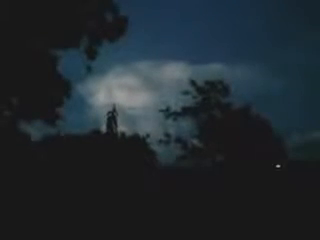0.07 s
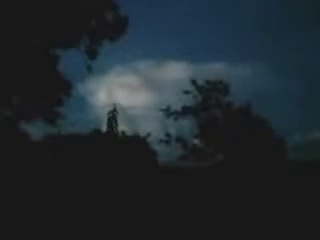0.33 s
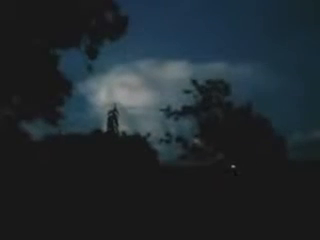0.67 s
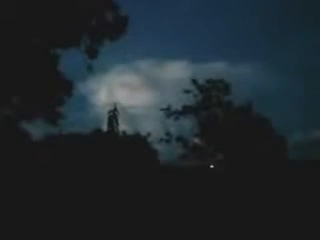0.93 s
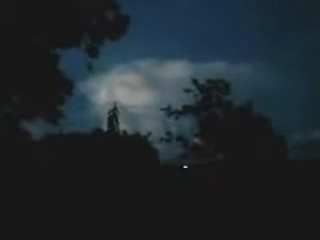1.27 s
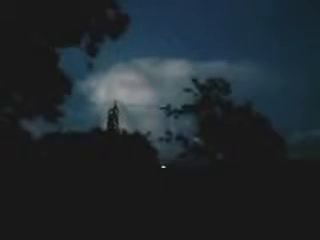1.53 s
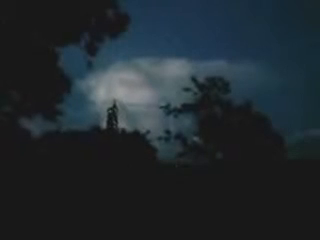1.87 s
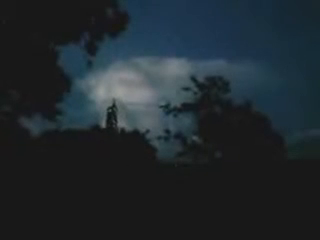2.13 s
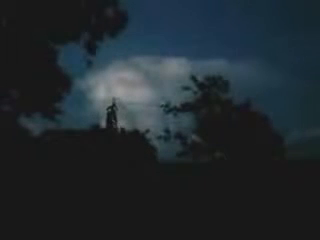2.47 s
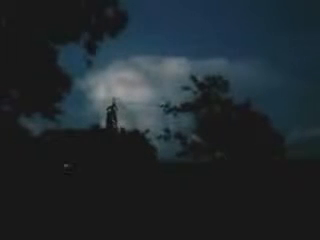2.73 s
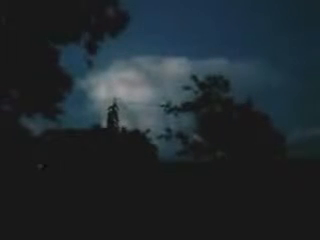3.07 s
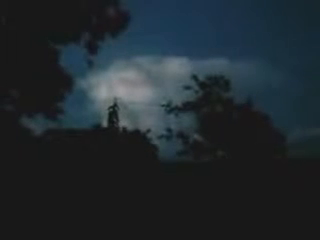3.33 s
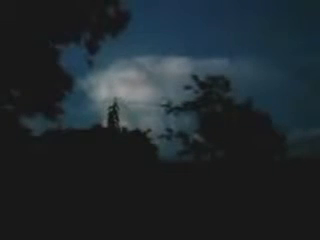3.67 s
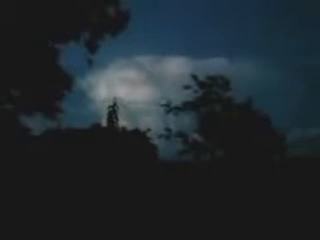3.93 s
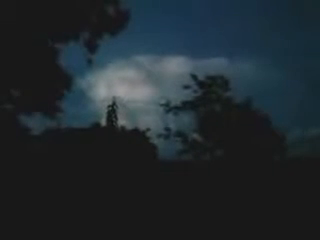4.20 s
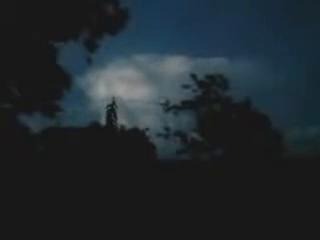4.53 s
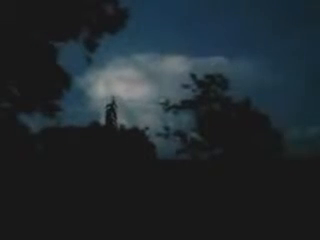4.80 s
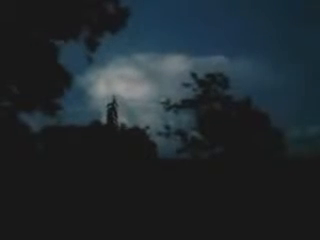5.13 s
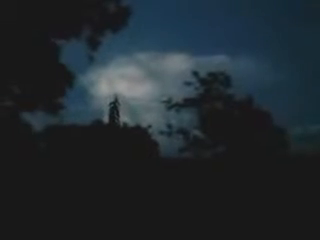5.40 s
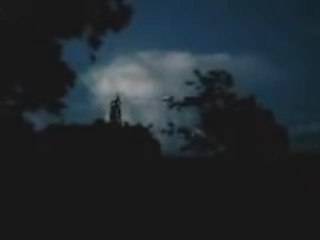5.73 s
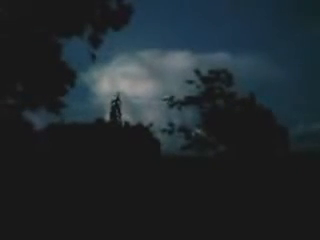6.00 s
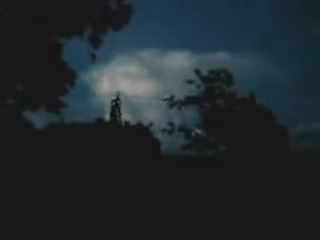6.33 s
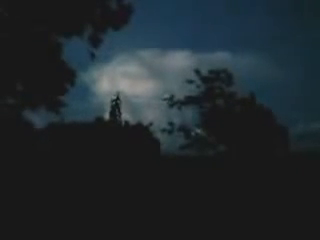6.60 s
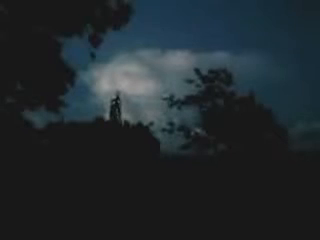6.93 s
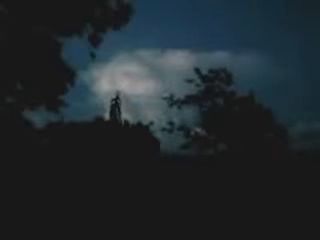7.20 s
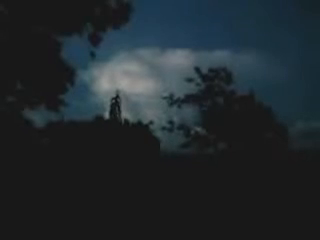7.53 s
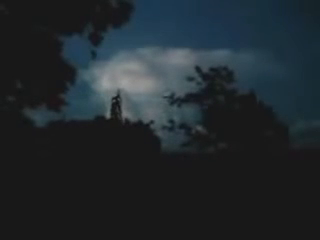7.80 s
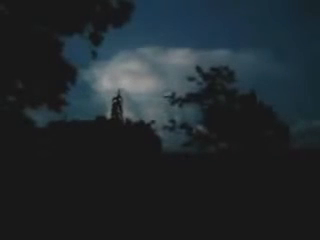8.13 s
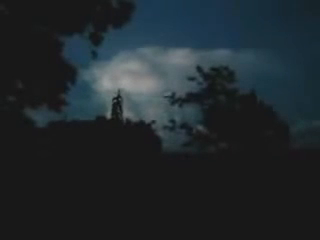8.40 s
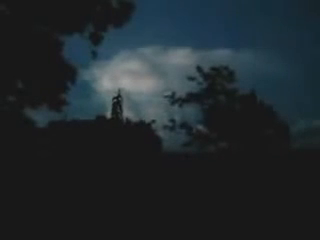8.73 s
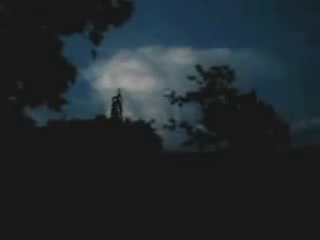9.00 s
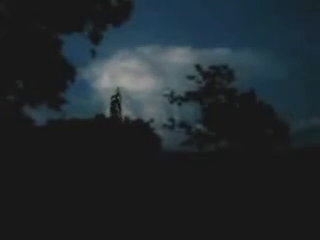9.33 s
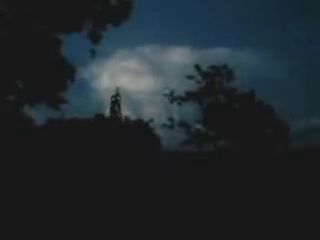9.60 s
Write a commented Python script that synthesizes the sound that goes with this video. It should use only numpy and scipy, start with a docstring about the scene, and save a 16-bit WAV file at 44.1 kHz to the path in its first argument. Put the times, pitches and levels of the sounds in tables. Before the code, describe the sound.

Husky, high bird calls echo among trees at dawn, over shimmering insects and the tyre roar and hum of far traffic.

```python
"""Birds close by at the edge of a swamp at dawn: short, shrill calls that sag and flick down at the end,
reaching the microphone in pulses. The trees around echo them, and others answer from far away.
A dense insect chorus shimmers steadily. On a distant road two cars pass with tyre roar and engine hum,
the first with a low drone. The microphone is a small camera's: mono, a narrow band, a faint hiss."""
import sys
import numpy as np
from scipy import signal
from scipy.fft import rfft, irfft, next_fast_len
from scipy.io import wavfile
from scipy.ndimage import uniform_filter1d

SR = 44100
rng = np.random.default_rng(int(sys.argv[2]) if len(sys.argv) > 2 else 0)


def log_audio(samples):
    """Write samples as a 16-bit WAV file to the path given in sys.argv[1]."""
    # one column per channel
    frames = np.atleast_2d(samples).T
    # limit to full scale, then quantise
    limited = np.clip(frames, -1, 1)
    pcm = np.round(limited * 32767).astype(np.int16)
    wavfile.write(sys.argv[1], SR, pcm)


N = 426006
TIME = np.arange(N) / SR


def undb(db):
    """Decibels to gain."""
    return 10 ** (np.asarray(db) / 20)


def unit(x):
    """Scale to rms 1."""
    return x / np.sqrt(np.mean(x ** 2))


def curves(table):
    """The columns of a table, joined by straight lines in time."""
    times, *columns = np.transpose(table)
    return [np.interp(TIME, times, column) for column in columns]


def bump(t, at, half_s):
    """A bell in time, 1 at its centre."""
    return np.exp(-((t - at) / half_s) ** 2)


def drift(rate, size=N):
    """Smooth random drift with about rate turns a second; spread near 1."""
    hold = int(SR / rate)
    steps = np.repeat(rng.standard_normal(size // hold + 1), hold)
    return 1.3 * uniform_filter1d(uniform_filter1d(steps, hold), hold)[:size]


def noise(spectrum):
    """Noise of rms 1 with the given colour, falling steeply beyond its ends."""
    size = next_fast_len(N)
    octave = np.log2(np.maximum(np.fft.rfftfreq(size, 1 / SR), 1))
    hz, db = np.transpose(spectrum)
    outside = np.abs(octave - np.clip(octave, np.log2(hz[0]), np.log2(hz[-1])))
    gain = undb(np.interp(octave, np.log2(hz), db) - 20 * outside)
    return unit(irfft(rfft(rng.standard_normal(size)) * gain, size)[:N])


def blurred(hz, width_hz):
    """A tone smeared into a narrow band of noise; rms near 1."""
    phase = 2 * np.pi * np.cumsum(hz * np.ones(N)) / SR
    return drift(2 * width_hz) * np.cos(phase) + drift(2 * width_hz) * np.sin(phase)


def nearness(at, half_s):
    """Gain of a source driving straight past the microphone: 1 at its nearest, then as 1 / distance."""
    return 1 / np.hypot(1, (TIME - at) / half_s)


# The insect chorus across the swamp (frequency [Hz], relative density [dB])
INSECT_SPECTRUM = [(2200, -15), (2950, -13.5), (3150, -3), (3330, -1), (3430, 2.5), (3570, -0.5),
                   (3750, -3.5), (4000, -9.5), (4200, -13.5), (4400, -19)]
def insects(db=-35.5, shimmer_db=2.0, swell_db=0.5, trill_hz=3416, trill_db=-45):
    """Countless trills merge into one shimmering band; one steady trill stands a little above it."""
    crowds = sum(noise(INSECT_SPECTRUM) * undb(shimmer_db * drift(70) + swell_db * drift(12))
                 for _ in range(2))
    return undb(db) * unit(crowds) + undb(trill_db) * blurred(trill_hz, width_hz=16)


# The open air at the microphone (frequency [Hz], relative density [dB])
AIR_SPECTRUM = [(15, -5), (35, -3), (55, -12), (80, -19.5), (200, -16), (500, -36), (2500, -20.5),
                (4000, -40.5)]
def air(db=-47.5, stir_db=3.6):
    """The air stirs: a low noise of uneven level."""
    return noise(AIR_SPECTRUM) * undb(db + stir_db * drift(13))


# Body rumble, tyre roar and tyre hiss from the distant road (frequency [Hz], relative density [dB])
BODY_RUMBLE = [(70, -9), (100, -9.5), (150, -3.5), (280, 1.5), (400, 0), (550, -4.5), (800, -8)]
TYRE_ROAR = [(350, -45), (550, -6), (750, 0), (1100, 0.5), (1400, -3), (2000, -29)]
TYRE_HISS = [(900, -7), (1300, -1.5), (1650, 2), (2050, 0.2), (2400, -3.5), (2900, -5), (3600, -24.5)]
# The two cars, levels before trim (nearest at [s], time to fall 3 dB [s], rumble [dB], roar [dB],
# hiss [dB])
CAR_PASSES = [(3.8, 0.88, -56.5, -36.5, -43), (5.8, 2.0, -43.5, -40, -37.5)]
def road(far_traffic_db=(-55, -46, -51), trims_db=(3, 0, 3.5), flutter_db=0.68):
    """Rumble, roar and hiss of two cars over steady traffic farther off, fluttering through the air."""
    power = undb(far_traffic_db)[:, None] ** 2
    for at, half_s, *levels in CAR_PASSES:
        power = power + np.outer(undb(levels), nearness(at, half_s)) ** 2
    layers = zip((BODY_RUMBLE, TYRE_ROAR, TYRE_HISS), np.sqrt(power), trims_db)
    return sum(noise(colour) * gain * undb(trim + flutter_db * drift(9)) for colour, gain, trim in layers)


def hum(hz, db, fading_db=3, wander=0.02095):
    """A far engine tone that wanders and flutters."""
    phase = 2 * np.pi * np.cumsum(hz * (1 + wander * drift(30))) / SR
    return np.sqrt(2) * np.sin(phase) * undb(db + fading_db * drift(22))


# Either car's exhaust, heard from the swamp (frequency [Hz], relative density [dB])
EXHAUST_SPECTRUM = [(50, -21.5), (80, -6.5), (110, -1.5), (180, 3.5), (290, -2.5), (400, -33.5)]
# The first car's drone; the driver eases off after passing (time [s], level before trim [dB])
DRONE_LEVELS = [(0, -52.5), (.8, -46.5), (1.6, -54), (2.5, -44.5), (3.3, -45.5), (4.3, -43), (4.8, -51.5),
                (6.3, -50), (6.9, -63), (7.4, -49), (8.1, -55), (9.1, -47), (9.66, -57)]
def first_engine(start_hz=215, sag_hz_per_s=2.05, trim_db=0.1, exhaust_db=-45.0):
    """A slowly sinking drone, and exhaust noise that throbs with it and fades as the car drives off."""
    (drone_db,) = curves(DRONE_LEVELS)
    exhaust = noise(EXHAUST_SPECTRUM) * undb(exhaust_db) * nearness(at=2.46, half_s=2.23)
    throb = undb(1.2 * drift(20))
    drone = hum(start_hz - sag_hz_per_s * TIME, drone_db + trim_db)
    return (drone + exhaust) * throb


def call_pitch(age, length, hz, sag, arch_hz, lift_hz, drop_hz, bend_s=0.0194):
    """The voice scoops up, arches, sags and lifts, then cracks and flicks down at the break."""
    arch = arch_hz * bump(age, 0.037, bend_s)
    lift = lift_hz * bump(age, length - 0.022, bend_s)
    flick_age = np.maximum(age - length + 0.0095, 0)  # starts just ahead of the break
    drop = drop_hz * (1 - bump(flick_age, 0, 0.018))
    contour = hz - sag * np.minimum(age, length) + arch + lift - drop
    scoop = 0.013 * np.exp(-age / 0.012)
    strain = np.exp(-np.maximum(length - age, 0) / 0.039)  # roughness grows towards the break
    waver = (0.0047 + 0.005 * strain) * drift(500, len(age))
    return contour * (1 - scoop + waver)


# Dips at the microphone, where echoes interfere with a call's strong harmonic
# (time [s], half length [s], depth [dB])
CALL_DIPS = [(0.28, 0.012, -6), (0.326, 0.015, -10.5), (0.364, 0.009, -21), (0.41, 0.0067, -10),
             (1.047, 0.007, -5.5), (1.079, 0.005, -19), (1.114, 0.006, -10), (1.138, 0.014, -10),
             (1.164, 0.007, -7), (2.036, 0.0067, -9), (2.106, 0.0049, -14), (2.138, .007, -9),
             (2.158, 0.0033, -18), (2.178, 0.0035, -16), (3.859, 0.009, -7.5), (3.898, 0.0035, -16),
             (3.921, 0.0037, -19), (3.956, 0.009, -6), (4.082, .01, -4), (4.119, .006, -9.5),
             (4.167, .012, -13), (4.203, 0.0064, -11), (4.221, 0.0063, -11), (4.25, 0.0044, -20),
             (5.651, .005, -6), (5.686, 0.0099, -8), (5.749, 0.0094, -17), (5.816, 0.026, -6),
             (6.228, .008, -5), (6.251, .008, -8), (6.28, 0.014, -6), (6.309, 0.0031, -15),
             (7.336, 0.01, -19), (7.383, 0.011, -18), (7.413, 0.0035, -11), (9.057, 0.01, -16),
             (9.105, 0.0055, -6), (9.123, .003, -8), (9.136, 0.0029, -16)]
# The voice's weak harmonics (multiple, level relative to the fourth [dB])
VOICE_HARMONICS = [(2, -23), (3, -19.5), (5, -16.5), (6, -29)]
def call(row, husk, attack_s=0.088, crest_s=0.037, push_s=0.022, flutter_db=0.5, rattle_hz=108):
    """One husky call, broken by brief dips in level: it crests, eases off, rattles and dies away."""
    start, length, *contour, db, ease_db_per_s, push_db, husk_db, release_s = row
    span = slice(int(start * SR), int((start + length + 0.16) * SR))
    age = TIME[:span.stop - span.start]
    fundamental_hz = call_pitch(age, length, *contour) / 4
    phase = 2 * np.pi * np.cumsum(fundamental_hz) / SR
    dip_db = sum(depth * bump(TIME[span], at, half_s) for at, half_s, depth in CALL_DIPS)
    strong = undb(dip_db + push_db * bump(age, length, push_s)) * np.sin(4 * phase)
    fading = lambda: drift(110, len(age)) / np.sqrt(2)  # each weak harmonic comes and goes on its own
    weak = sum(undb(level) * (fading() * np.sin(k * phase) + fading() * np.cos(k * phase))
               for k, level in VOICE_HARMONICS)
    voice = strong + weak + undb(husk_db) * husk[span]
    effort_db = db - ease_db_per_s * np.maximum(age - crest_s, 0)
    swell = undb(effort_db + flutter_db * drift(120, len(age)))
    attack = np.minimum(age / attack_s, 1) ** 0.5
    release = np.exp(-(np.maximum(age - length, 0) / release_s) ** 0.94)
    rattle = 1 + 0.44 * bump(age, length, 0.021) * np.cos(2 * np.pi * rattle_hz * (age - length))
    return np.sqrt(2) * voice * swell * attack * release * rattle


# The husky noise in the voice (frequency [Hz], relative density [dB])
HUSK_SPECTRUM = [(1000, 0), (2000, -12.5), (2700, -11), (3100, -16), (3750, 4.5), (4300, -18)]
# Calls near the microphone (start [s], length to the break [s], fourth harmonic [Hz], sag [Hz/s],
# opening arch [Hz], lift before the break [Hz], closing drop [Hz], level [dB], easing [dB/s],
# push at the break [dB], relative husk [dB], release [s])
NEAR_CALLS = [(0.2, 0.223, 2785, 519, 23.6, 9, 110, -17.5, 8, 0, -25, 0.018),
              (0.965, 0.219, 2822, 399, 0.44, 9, 90, -20, 9.5, 0.5, -26, 0.016),
              (1.99, 0.21, 2750, 243, 46.6, 19, 60, -15.5, 35, -0.5, -21.5, 0.034),
              (3.778, 0.21, 2876, 480, 5, -3, 100, -20, 27, -4, -23, 0.048),
              (4.055, 0.211, 2761, 382, 40, 19, 100, -13, 46, 3.5, -22.5, 0.021),
              (5.63, 0.22, 2756, 260, 49, 2, 71, -15, 22, 1, -25, 0.031),
              (6.16, 0.162, 2827, 358, 9.5, 3, 70, -19.5, 27, -0.5, -25, .05),
              (7.228, 0.21, 2739, 158, 7.5, 69.5, 120, -15.5, 51, 8.5, -19, 0.029),
              (8.943, 0.22, 2748, 447, 19.5, 45, 110, -17, 27, 2, -21.5, 0.017)]
def near_birds():
    """The birds close by give their calls one at a time, each a little husky."""
    out, husk = np.zeros(N), noise(HUSK_SPECTRUM)
    for row in NEAR_CALLS:
        sound, first = call(row, husk), int(row[0] * SR)
        out[first:first + len(sound)] += sound
    return out


def breaks(half_s, delay_s):
    """A short bell of gain at the break of every near call."""
    return sum(bump(TIME, start + length + delay_s, half_s) for start, length, *_ in NEAR_CALLS)


# The hoarse smear heard at each call's end, where its downward flick and echoes blur together
# (frequency [Hz], relative density [dB])
SMEAR_SPECTRUM = [(1900, -19), (2250, -5), (2400, -4.5), (2600, 0.5), (2750, -3.5), (2950, -19.5),
                  (3350, -19), (3600, -30)]
def smears(db=-31):
    """A short burst of noise at each near call's end, around and just under its pitch."""
    return undb(db) * breaks(half_s=0.026, delay_s=-0.0058) * noise(SMEAR_SPECTRUM)


def tree_echo(sound, t60_s=0.5, gap_s=0.027):
    """Trunks and leaves scatter a diffuse echo that builds up after a short gap."""
    t = TIME[:SR]
    build_up = 1 - bump(t, 0, gap_s)
    response = rng.standard_normal(SR) * undb(-60 * t / t60_s) * build_up
    return signal.fftconvolve(sound, response / np.sqrt(np.sum(response ** 2)))[:N]


# Answers from far across the swamp (start [s], length [s], pitch [Hz], level [dB])
FAR_ANSWERS = [(0.601, 0.17, 2790, -40), (2.604, 0.18, 2910, -41), (4.822, 0.17, 2900, -39)]
def far_birds(sag=0.03, blur=0.011, flutter_db=3):
    """Of a distant call only the strongest harmonic carries, blurred and fluttering."""
    out, waver = np.zeros(N), blur * drift(300)
    for start, length, hz, db in FAR_ANSWERS:
        progress = np.clip((TIME - start) / length, 0, 1)
        phase = 2 * np.pi * np.cumsum(hz * (1 - sag * progress + waver)) / SR
        out += undb(db) * np.sin(np.pi * progress) * np.sin(phase)
    return out * undb(flutter_db * drift(60))


# Swells from the distant road (time [s], half length [s], centre [Hz], width [Hz], level [dB])
ROAD_SWELLS = [(2.0, 0.6, 284.4, 49.8, -48), (3.052, 0.19, 1323, 349, -38), (3.7, 0.23, 1550, 349.4, -34.5),
               (4.4, .45, 1147, 299.5, -40), (5.8, 0.14, 270, 60, -41.5)]
def road_swells():
    """Bands of the traffic noise rise and sink one after another as the cars go by."""
    return sum(undb(db) * bump(TIME, at, half_s) * blurred(hz, width_hz)
               for at, half_s, hz, width_hz, db in ROAD_SWELLS)


# Tyre tread singing on the distant road (time [s], pitch [Hz], level [dB])
TREAD_TONE = [(0, 1197, -71), (3.1, 1119, -40), (3.7, 1100, -48), (4.15, 805, -46.5), (4.6, 774, -39.5),
              (5.2, 769, -48), (9.66, 752, -57)]
def tread(width_hz=130):
    """Tread blocks strike the road irregularly: a blurred tone that sinks as the car goes by."""
    hz, db = curves(TREAD_TONE)
    return undb(db) * blurred(hz, width_hz)


# The second car's engine, far off (multiple, level [dB], loudest at [s], time to fall 3 dB [s])
ENGINE_HARMONICS = [(1, -50, 5.4, 0.27), (2, -50.5, 5.4, 1.6), (3, -52, 7, 1.2)]
def second_engine(hz=137, exhaust_db=-48):
    """The second car's hum and exhaust; its higher harmonics carry longest as it drives on."""
    tones = sum(hum(k * hz, db, fading_db=3.5, wander=0.01307) * nearness(at, half_s)
                for k, db, at, half_s in ENGINE_HARMONICS)
    exhaust = nearness(at=5.5, half_s=0.7) * undb(exhaust_db) * noise(EXHAUST_SPECTRUM)
    return tones + exhaust


def scene():
    """Birds among trees, over insects, road and the low stir of the air; the closing flicks echo most."""
    near, hoarse, far = near_birds(), smears(), far_birds()
    flicks = near * breaks(half_s=0.013, delay_s=0.016)
    echo = tree_echo(undb(-13.5) * near + undb(-7.5) * flicks + undb(-3) * (hoarse + far))
    stir = air()
    traffic = road() + road_swells() + tread() + first_engine() + second_engine()
    return (near + hoarse + far + echo + insects() + traffic + stir)[None]


# The camera's own hiss (frequency [Hz], relative density [dB])
HISS_SPECTRUM = [(4600, -7.5), (5000, -4.5), (5250, -1.5), (11000, -3)]
# The camera's faint whine (frequency [Hz], level before trim [dB])
WHINE_TONES = [(6298, -74.5), (7876, -77), (9448, -79)]
def record(dry, band_hz=4400, top_hz=11100, hiss_db=-57, whine_trim_db=-2, offset=-0.036):
    """The camera passes a narrow band, then adds its own hiss, a faint whine and a constant offset."""
    band_filter = signal.ellip(10, .3, 70, band_hz, fs=SR, output="sos")
    top_filter = signal.ellip(14, .2, 80, top_hz, fs=SR, output="sos")
    whine = sum(undb(db + whine_trim_db) * blurred(hz, width_hz=7) for hz, db in WHINE_TONES)
    hiss = undb(hiss_db) * noise(HISS_SPECTRUM)
    narrow = signal.sosfilt(band_filter, dry)
    return offset + signal.sosfilt(top_filter, narrow + hiss + whine)


dry = scene()
out = record(dry)
log_audio(out)
```